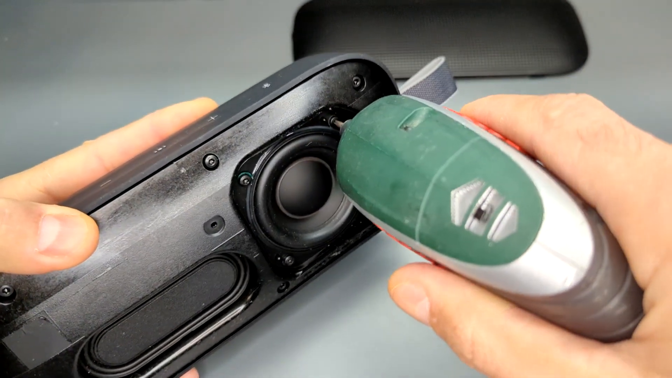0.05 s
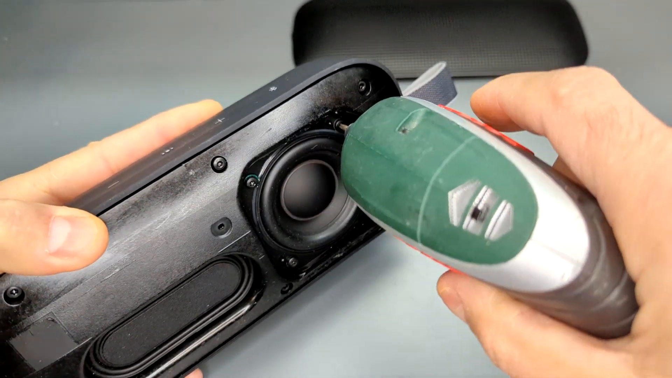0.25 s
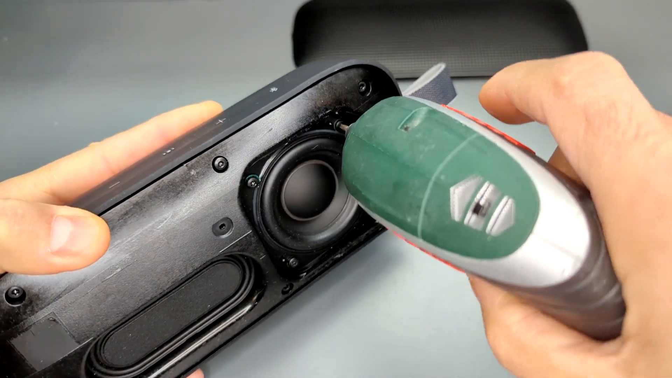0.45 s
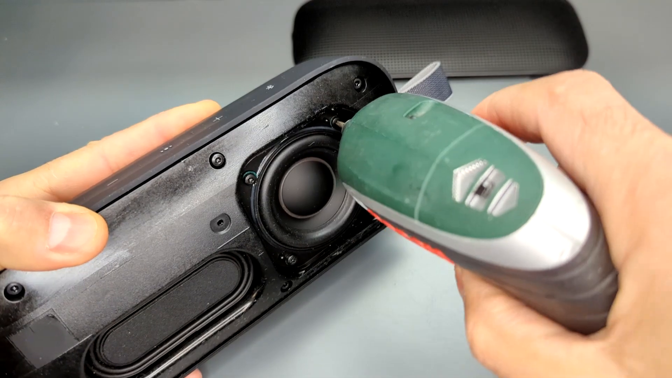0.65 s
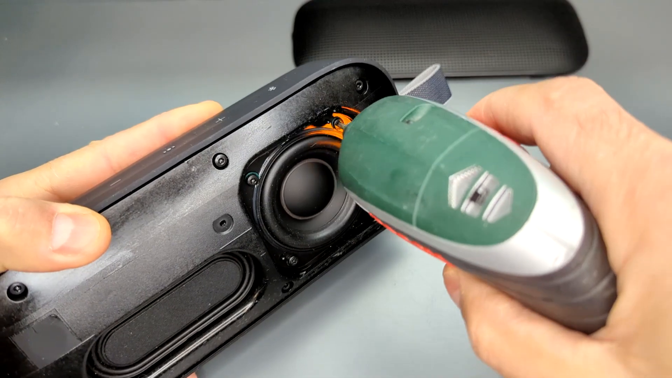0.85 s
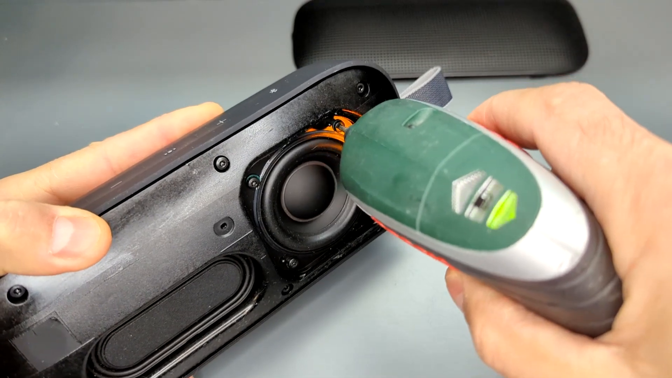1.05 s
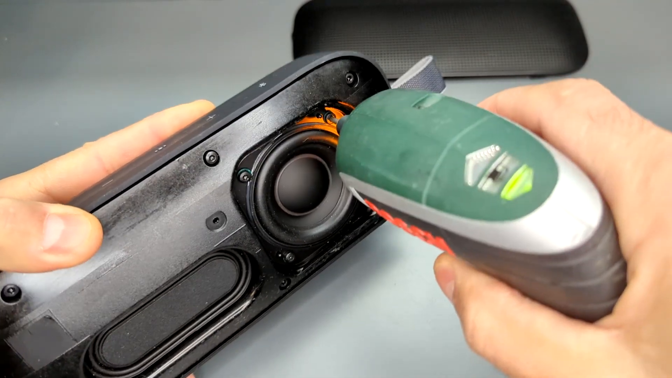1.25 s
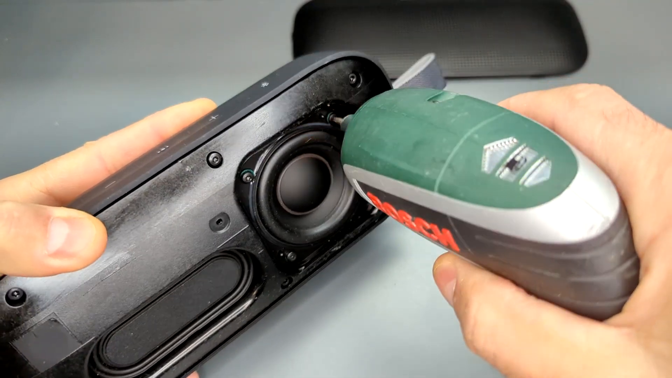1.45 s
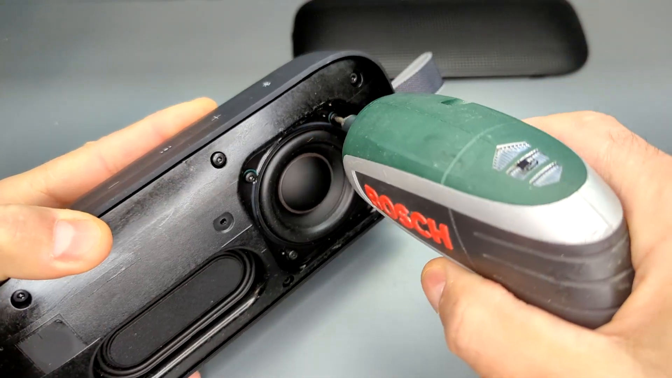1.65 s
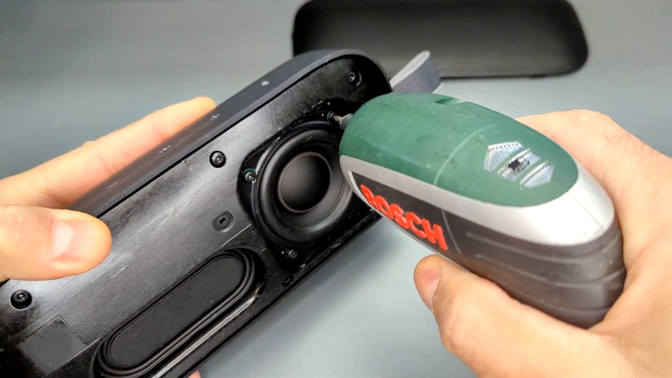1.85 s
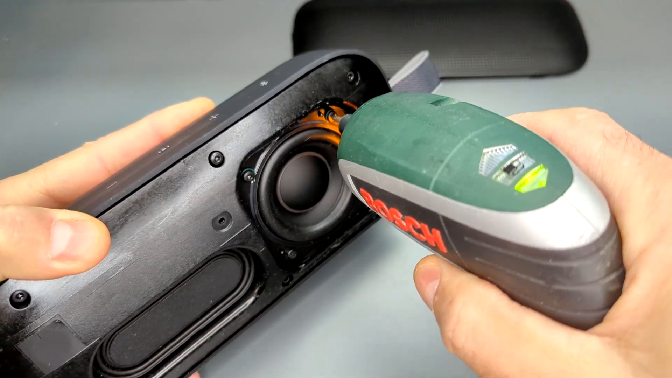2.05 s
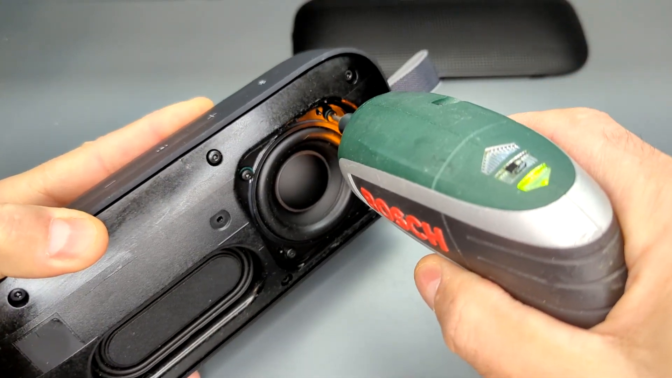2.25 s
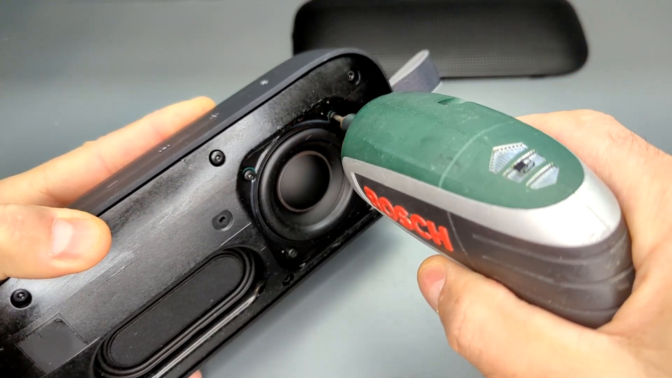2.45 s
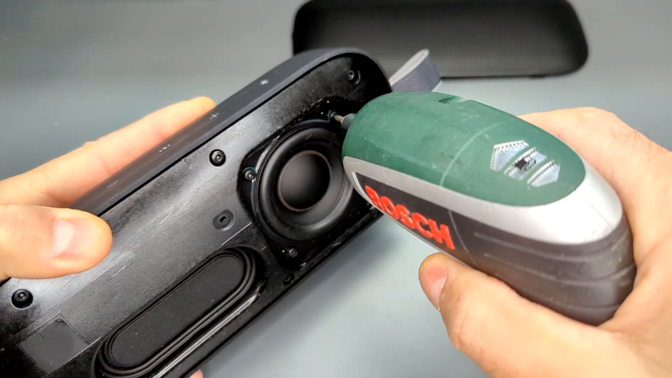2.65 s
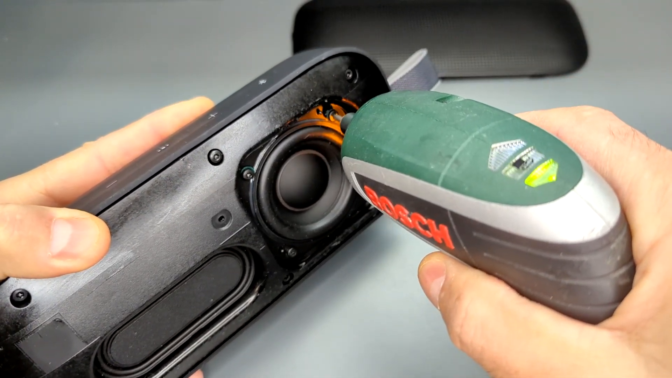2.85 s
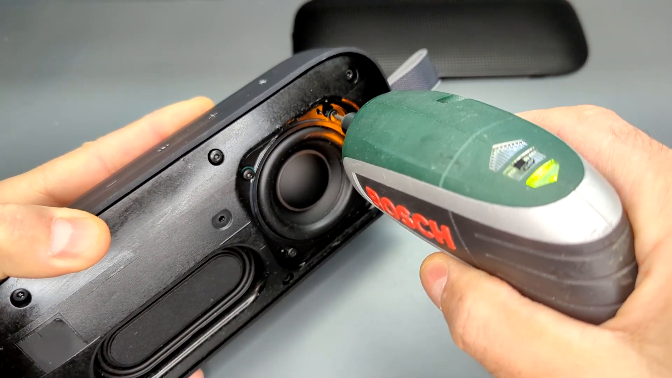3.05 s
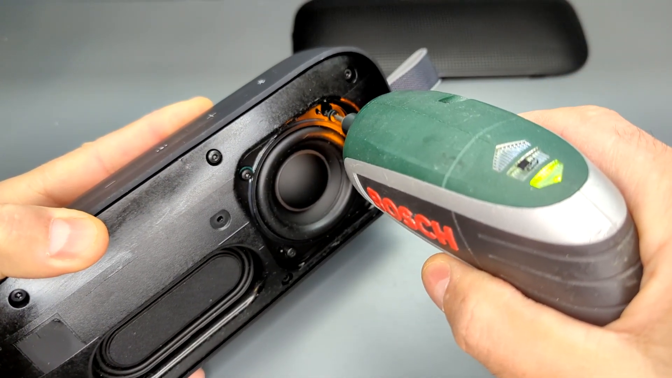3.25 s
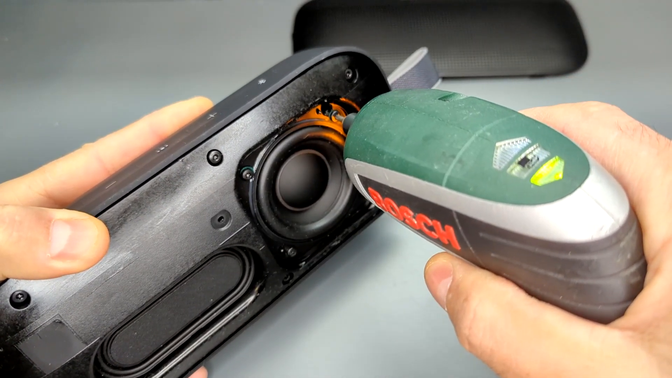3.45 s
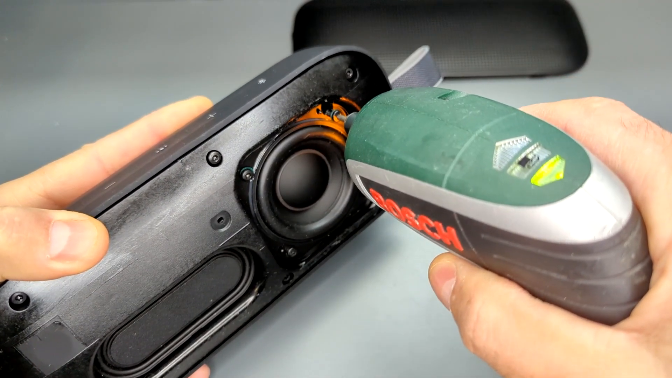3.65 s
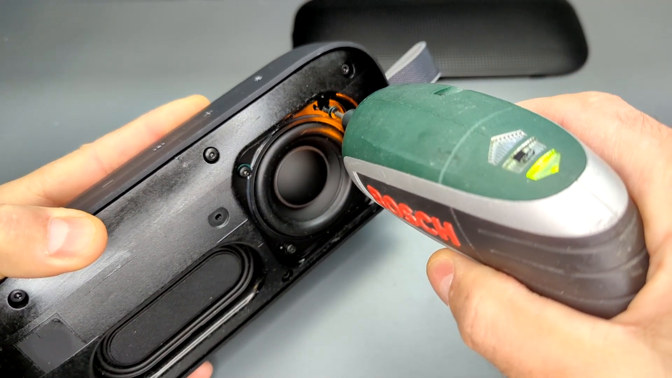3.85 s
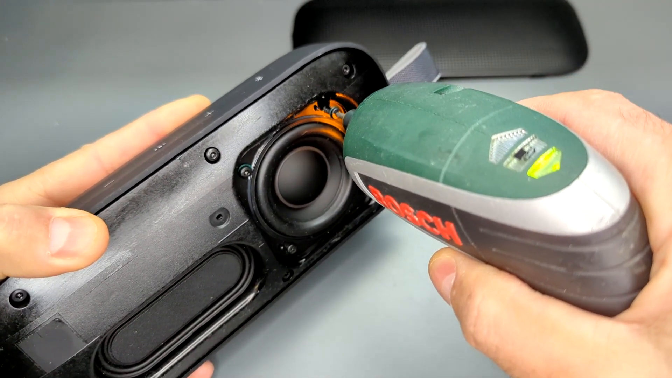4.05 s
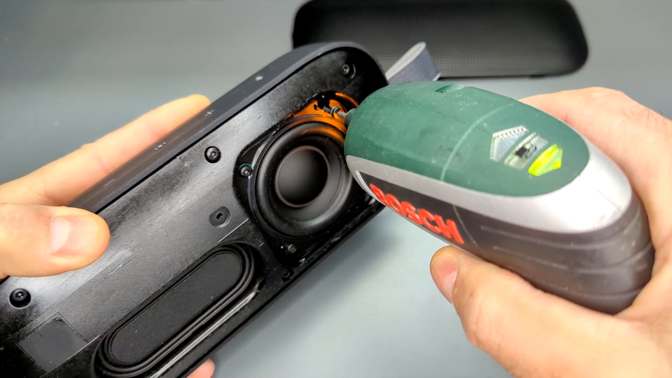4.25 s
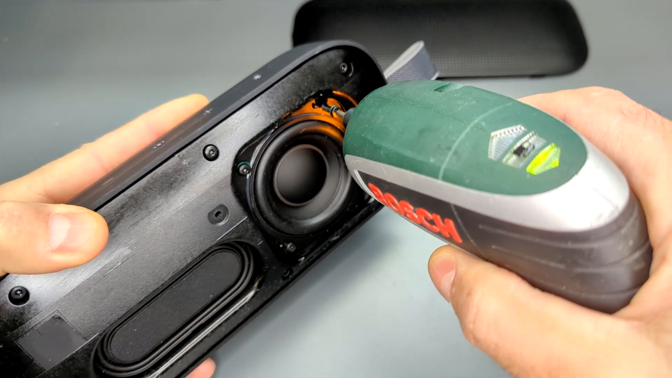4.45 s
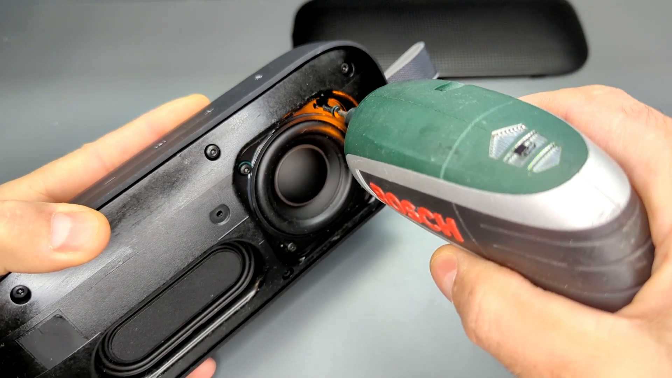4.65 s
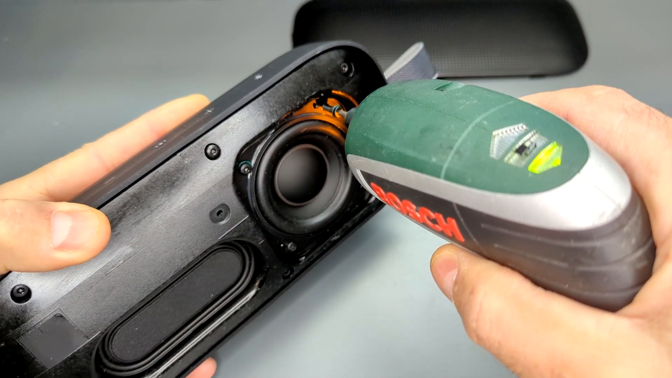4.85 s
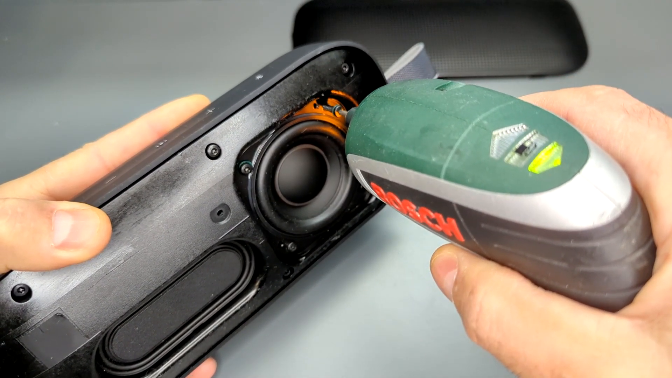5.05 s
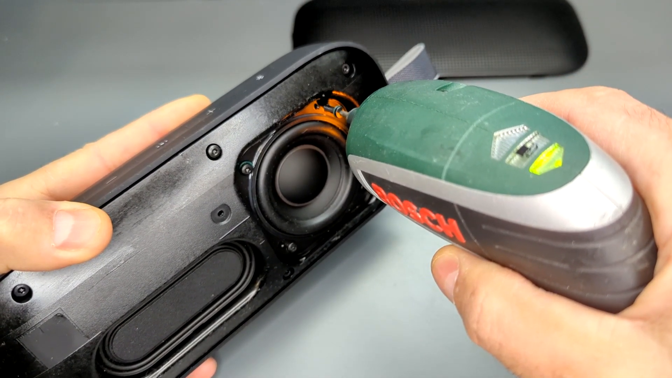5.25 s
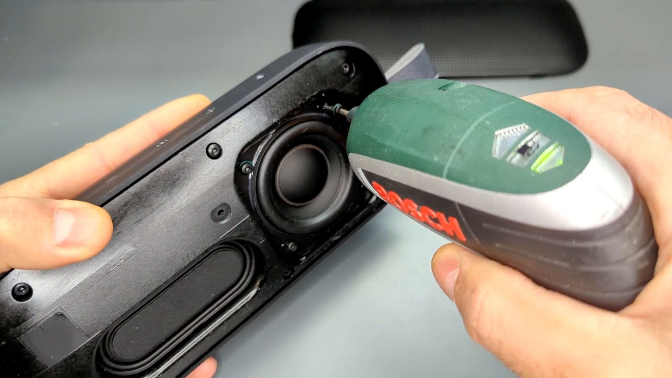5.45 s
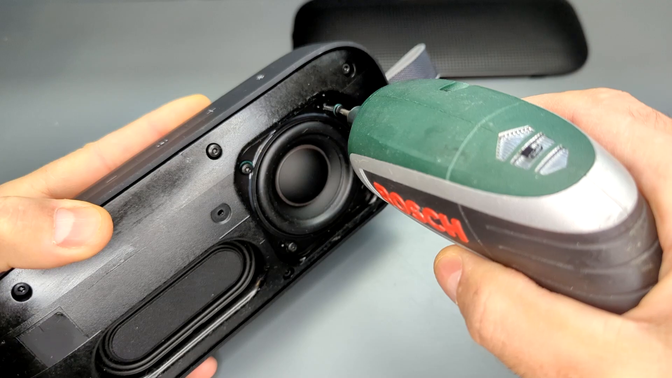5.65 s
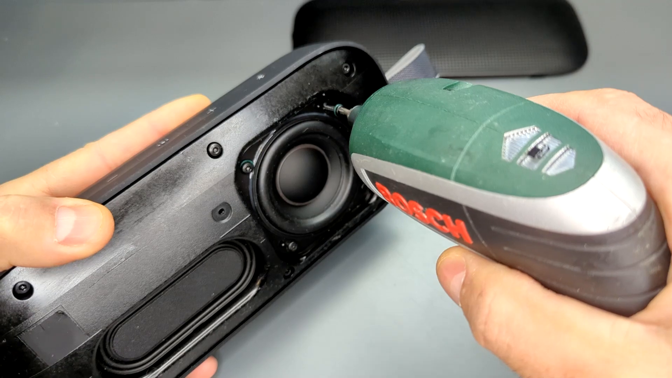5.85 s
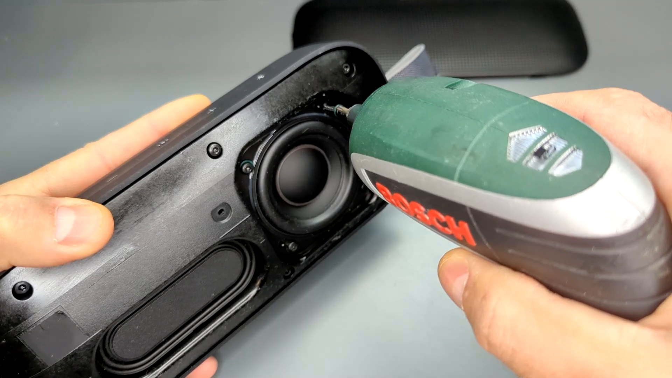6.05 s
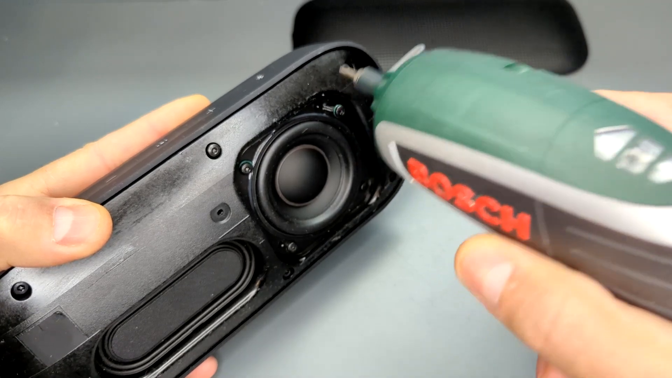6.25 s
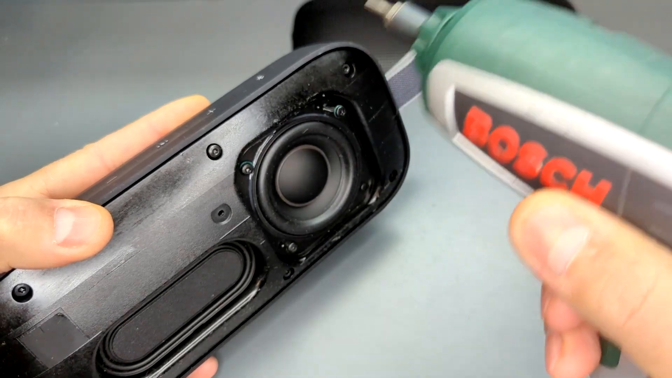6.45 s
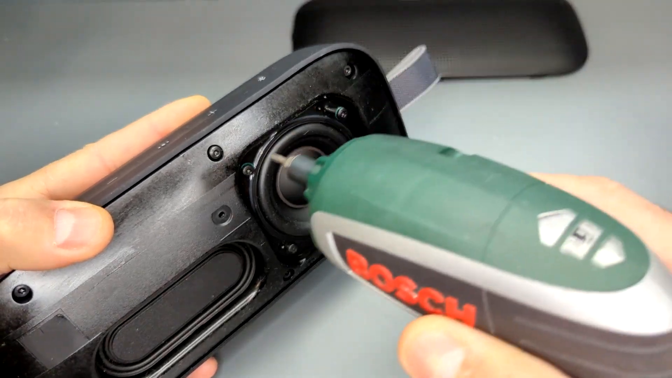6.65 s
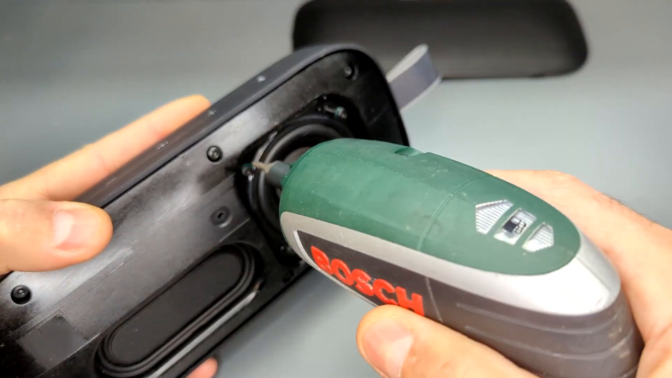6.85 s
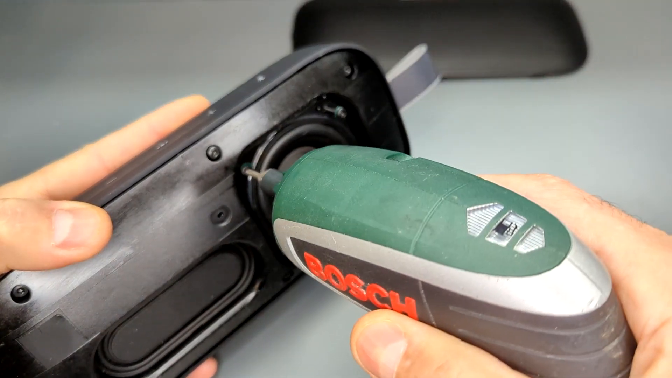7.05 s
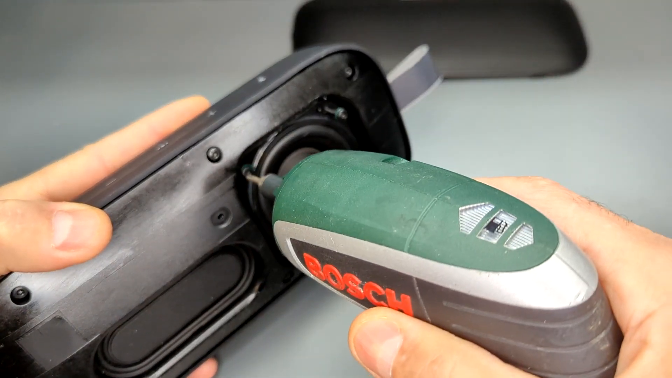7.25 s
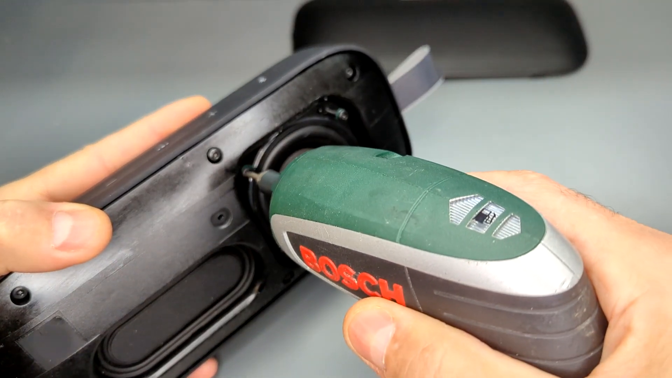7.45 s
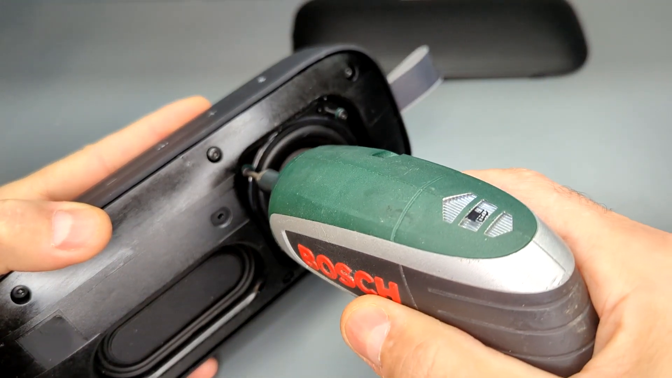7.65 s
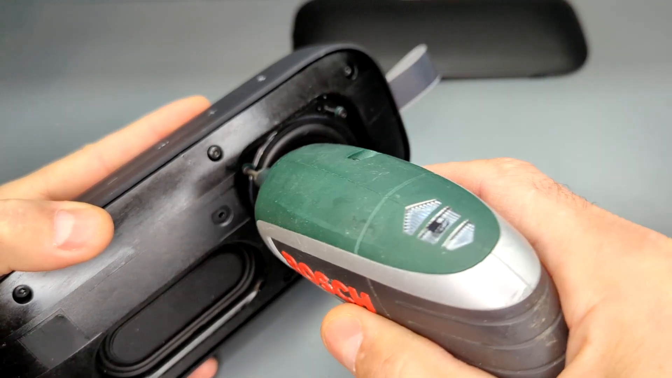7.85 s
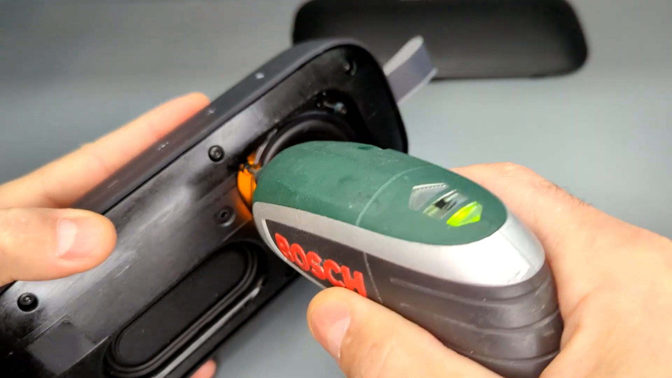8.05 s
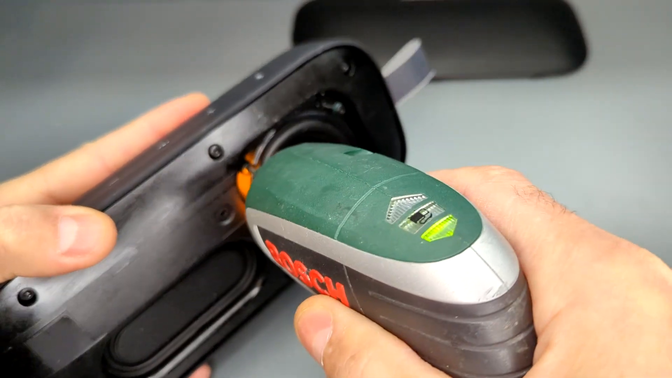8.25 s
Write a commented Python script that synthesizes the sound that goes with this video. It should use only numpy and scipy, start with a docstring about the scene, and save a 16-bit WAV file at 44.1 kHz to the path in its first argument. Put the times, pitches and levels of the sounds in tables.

```python
"""A quiet room with a low rumble, then ticks and scrapes of a bit on plastic close to a stereo microphone.
A cordless screwdriver then backs screws out of a plastic housing on a bench, in bursts.
Its three-pole motor whines on multiples of the shaft speed; the planetary gears rattle as shaped noise
and sing under load as tones of the meshing teeth. Ticks are noise cracks over a ring of the plastic,
scrapes are grainy noise, and something creaks low as a run of slips that each ring a hollow body."""
import sys
import numpy as np
from scipy import signal
from scipy.fft import rfft, irfft, next_fast_len
from scipy.io import wavfile
from scipy.ndimage import uniform_filter1d

SR = 44100
rng = np.random.default_rng(int(sys.argv[2]) if len(sys.argv) > 2 else 0)


def convert_level_to_amplitude(level_db):
    """Map a level in decibels to its linear amplitude factor."""
    exponent = np.asarray(level_db, float) / 20
    return 10 ** exponent


def int16_out(signal):
    """Quantize to a 16-bit WAV file."""
    q = np.round(np.clip(np.atleast_2d(signal).T, -1, 1) * 32767)
    wavfile.write(sys.argv[1], SR, q.astype(np.int16))


N = 366471  # length in samples

POLES, TEETH = 3, 9
MESH_SHARE = .593  # teeth meet at this share of shaft speed, since the planets run along
MESH_PER_TURN = TEETH * MESH_SHARE

# Modes of the hollow body that creaks; the first also tunes the hum of the held housing.
# Each row: frequency in Hz, relative level in dB, time to fall 60 dB in seconds.
BODY_MODES = [(375, -3, 0.063), (446, 5, 0.02), (286, -30, 0.059), (546, -7, 0.031)]


def evened(x):
    """Scales to rms 1."""
    return x / np.sqrt(np.mean(x ** 2) + 1e-20)


def read(points, hz):
    """Reads a (Hz, value) table on a log-frequency axis."""
    f, value = np.transpose(points)
    return np.interp(np.log(hz + 1), np.log(f + 1), value)


def curve(rows):
    """A (s, value) table at every sample."""
    return np.interp(np.arange(N) / SR, *np.transpose(rows))


def add(mix, s, sound):
    """Mixes a sound in at s seconds."""
    part = mix[..., round(s * SR):][..., :sound.shape[-1]]
    part += sound[..., :part.shape[-1]]


def colour(x, db_of_hz):
    """Filters by a gain rule in dB over frequency."""
    size = next_fast_len(x.shape[-1])
    gain = convert_level_to_amplitude(db_of_hz(np.fft.rfftfreq(size, 1 / SR)))
    return irfft(rfft(x, size) * gain, size)[..., :x.shape[-1]]


def wander(size, hz):
    """Random drift of rms 1, slower than hz."""
    lowpass = signal.butter(2, hz, fs=SR, output="sos")
    return evened(signal.sosfilt(lowpass, rng.standard_normal(size)))


def swells(rows, rise_db_per_s, fall_db_per_s):
    """Gain of (start s, hold s, dB) events that climb, hold and sink on straight dB slopes."""
    t = np.arange(N) / SR
    gain = np.zeros(N)
    for s, hold, db in rows:
        climb = rise_db_per_s * np.maximum(s - t, 0)
        sink = fall_db_per_s * np.maximum(t - s - hold, 0)
        gain += convert_level_to_amplitude(db - climb - sink)
    return gain


def ring(modes, spread, rise):
    """One blow on a set of modes, each with chance in level and pitch, rising over some seconds; peak 1."""
    t = np.arange(SR // 8) / SR
    hz, db, t60 = np.transpose(modes)[:, :, None]
    level_chance, pitch_chance = rng.standard_normal((2, len(modes), 1))
    decay = convert_level_to_amplitude(db + spread * level_chance - 60 * t / t60)
    wave = np.sin(2 * np.pi * hz * (1 + 0.031 * spread * pitch_chance) * t)
    blow = (decay * wave).sum(0) * (1 - np.exp(-t / rise)) ** 2
    return blow / abs(blow).max()


def room_hiss():
    """Faint drifting hiss of the room, partly alike in the two ears, 6 dB stronger on the left."""
    # Each row: time in seconds, level in dB midway between the ears.
    level = [(0, -66), (6, -63), (6.6, -64.5), (7.4, -71), (8.3, -66.5)]
    # Each row: frequency in Hz, relative density in dB per Hz.
    hiss_spectrum = [(12, -53.5), (25, -37.5), (88, -11.5), (190, -23), (235, -8.5), (320, -20),
                     (1060, -22), (1190, -18.5), (1380, -25.5), (2050, -7.5), (2500, -18), (2980, -10.5),
                     (4200, -27), (5400, -37), (6500, -29), (8200, -39.5), (16000, -46.5)]
    # Each row: frequency in Hz, left-right likeness from -1 to 1.
    likeness = [(30, 1), (100, 0.92), (240, 0.71), (950, 0.16), (3770, -0.41), (15000, 0)]
    size = next_fast_len(N)
    hz = np.fft.rfftfreq(size, 1 / SR)
    a, b = rfft(rng.standard_normal((2, size)))
    same = np.clip(read(likeness, hz), -1, 1)
    ears = np.array([a, same * a + np.sqrt(1 - same ** 2) * b])
    hiss = irfft(ears * convert_level_to_amplitude(read(hiss_spectrum, hz)), size)[:, :N]
    return convert_level_to_amplitude(curve(level) + [[3], [-3]]) * evened(hiss)


def bench_rumble():
    """Low noise through the bench, swelling with hand jolts and while the running tool shakes it."""
    # Underlying rumble. Each row: time in seconds, relative level in dB.
    rumble = [(0, -68), (6.6, -64.5), (7.4, -76), (8.3, -64.5)]
    # Hand jolts. Each row: time in seconds, relative level in dB.
    bumps = [(.53, -53), (0.709, -62.5), (1.11, -42.5), (1.461, -55), (2.05, -52.5), (2.16, -59),
             (2.342, -50.5), (2.92, -58.5), (4.15, -59), (4.51, -56), (6.5, -71), (6.7, -65), (6.89, -68),
             (7.57, -55), (7.75, -57), (8.14, -45)]
    # Shaking by the tool. Each row: start in seconds, hold in seconds, relative level in dB.
    shake = [(2.9, 0.64, -58), (3.7, 0.8, -61.5)]
    # Each row: frequency in Hz, relative density in dB per Hz.
    thud_spectrum = [(12, -34.5), (20, -13.5), (65, -1), (97, -3.5), (162, 0.5), (303, -5), (499, -22),
                     (600, -18), (780, -40), (1320, -120)]
    low = rng.standard_normal(N) + .22 * rng.standard_normal((2, N))  # nearly the same in both ears
    low = colour(low, lambda hz: read(thud_spectrum, hz) - 30 * np.log2(np.maximum(hz / 600, 1)))
    events = [(s, 0, db) for s, db in bumps] + list(shake)
    jolts = swells(events, rise_db_per_s=251.5, fall_db_per_s=132)
    return convert_level_to_amplitude(-9) * (convert_level_to_amplitude(curve(rumble)) + jolts) * evened(low)


def creak():
    """Stick and slip: a run of slips that each ring a low hollow body, a little left of centre."""
    # Each entry: time of a slip in seconds.
    slips = [5.692, 5.719, 5.742, 5.769, 5.795, 5.81, 5.84, 5.871, 5.897, 5.921, 5.948, 5.975, 6.001, 6.035,
             6.073, 6.116, 6.158, 6.197, 6.251, 6.282, 6.316, 6.343, 6.379, 6.422, 6.448, 6.479, 6.505]
    out = np.zeros(N)
    for s, chance in zip(slips, rng.standard_normal(len(slips))):
        db = -39 - 10 * np.exp(-(s - slips[0]) / .12)  # starts weak and grows
        db += 0.8 * chance - 8 * (s == slips[-1])  # lets go with a weak slip
        add(out, s, convert_level_to_amplitude(db) * ring(BODY_MODES, spread=0.73, rise=0.0015))
    # keeps the band between about 220 and 650 Hz
    out = colour(out, lambda hz: -10 * np.log10(1 + (220 / (hz + 1)) ** 6 + (hz / 650) ** 6))
    return out * convert_level_to_amplitude([[1.5], [-1.5]])


def scrapes():
    """Grainy rubbing of the bit on plastic: coloured noise of fast random level in short swells."""
    # Each row: start in seconds, hold in seconds, level in dB.
    scrape_events = [(.16, 0.029, -64), (.482, 0.024, -48), (.535, 0.036, -59.5), (.699, 0.062, -50),
                     (1.833, .02, -53.5), (6.33, 0.04, -63.5), (7.565, 0.027, -61), (7.64, 0.021, -65),
                     (7.955, 0.034, -63)]
    # Each row: frequency in Hz, relative density in dB per Hz.
    scrape_spectrum = [(180, -46), (300, -35), (398, -15), (1010, -14.5), (2140, -1.5), (3290, -7.5),
                       (6520, -20), (16000, -35)]
    grain = rng.standard_normal((2, N)) * convert_level_to_amplitude(3.2 * wander(N, 600))
    rubbing = evened(colour(grain, lambda hz: read(scrape_spectrum, hz)))
    return swells(scrape_events, rise_db_per_s=4000, fall_db_per_s=343.5) * rubbing


def ticks():
    """Bit and trigger: a short dry crack of noise over a brief ring of the plastic."""
    # Each row: time in seconds, level in dB, treble tilt of the crack in dB, left over right in dB.
    tick_events = [(0.193, -35, -10, 3.5), (0.251, -40.5, -5.5, 4), (0.284, -33.5, 1.5, 1),
                   (0.382, -38.5, -12, 3), (0.481, -35, -2.5, 7.5), (0.49, -17.5, 13, 5),
                   (0.534, -18.5, -1, 3.5), (0.595, -47.5, -9, 3), (0.7, -40, -9, 3.0),
                   (1.057, -26.5, -12, 5), (1.834, -44.5, -20, 7), (2.022, -27, -4, 4.5),
                   (2.814, -25.5, -2.5, 7.5), (5.94, -49, -28, 1), (6.325, -33, -10, 5.5),
                   (6.497, -40, -40, 7.0), (7.559, -27.5, -36, 5.5), (7.604, -36.5, -15, 3),
                   (7.643, -31.5, -57, 8), (7.712, -37.5, -45, 4), (7.832, -42, -40, 5),
                   (7.952, -38.5, -41, 5.0), (8.081, -19, 0.5, -2)]
    # Each row: frequency in Hz, relative density in dB per Hz.
    crack_spectrum = [(180, -56.5), (300, -14), (1120, -8.5), (3030, -12.5), (4160, -7.5), (7320, -7),
                      (16000, -29)]
    # Each row: frequency in Hz, relative level in dB, time to fall 60 dB in s before the tick's own fade.
    plastic_modes = [(810, -21.5, 0.059), (1009, 2.5, 0.06), (1600, -24, 0.093), (1982, 1, 0.37),
                     (2770, -19.5, 0.056), (3200, 9.5, 0.276), (5430, -50, 0.29)]
    out, t = np.zeros((2, N)), np.arange(SR // 8) / SR
    fade = convert_level_to_amplitude(-60 * t / .027) * (1 - np.exp(-t / .0006))
    for s, db, treble_db, pan_db in tick_events:
        noise = rng.standard_normal(len(t)) + 2.2 * rng.standard_normal((2, len(t)))

        def crack_db(hz):
            return read(crack_spectrum, hz) + treble_db * np.clip(np.log2(hz / 3500 + 0.12), 0, 1)

        crack = evened(colour(noise, crack_db))
        ping = .2 * ring(plastic_modes, spread=6, rise=.0003)
        tick = (ping + 0.29 * crack) * fade
        add(out, s, convert_level_to_amplitude(db + pan_db * np.array([[.5], [-.5]])) * tick)
    return out


def motor_whine(turn, shaft_db, pole_db):
    """Tones on multiples of the shaft angle: its shake, the passing poles and the whine around them."""
    # Each row: multiple of shaft speed, level in dB over the pole tone.
    whine = [(2, -25), (4, -13), (4.66, -14), (6.27, -12), (9, -12), (18, -12), (24, -9)]
    size = len(turn)
    tone = convert_level_to_amplitude(shaft_db) * np.cos(turn)
    tone += convert_level_to_amplitude(pole_db + 0.99 * wander(size, 43)) * np.cos(POLES * turn)
    for multiple, db in whine:
        tone += convert_level_to_amplitude(pole_db + db + wander(size, 25)) * np.cos(multiple * turn)
    return tone


def gear_song(mesh, rattle_db, mesh_db, octave_db):
    """Tones of the meshing teeth: fundamental, octave and flickering overtones."""
    # Each row: multiple of the mesh frequency, relative level in dB.
    overtones = [(3, 0), (4, -1), (5, -1), (6, -6), (7, -4), (9, -8)]
    size = len(mesh)
    throb_db = 2.5 * wander(size, 45)  # the screw grips unevenly: all mesh tones lurch together
    tone = convert_level_to_amplitude(mesh_db + throb_db + 1.2 * wander(size, 70)) * np.cos(mesh)
    octave_gain = convert_level_to_amplitude(octave_db + throb_db + 1.8 * wander(size, 71))
    tone = tone + octave_gain * np.cos(2 * mesh + [[.4], [-.4]])
    over_db = np.minimum(octave_db - 9, rattle_db - 11)  # overtones follow the octave, up to a limit
    # overtones reach each ear by another path, so with another phase
    phases = 1.6 * rng.random((len(overtones), 2, 1)) + 2 * np.pi * rng.random((len(overtones), 1, 1))
    for (multiple, db), phase in zip(overtones, phases):
        flicker_db = 5.5 * wander(size, 55)
        tone = tone + convert_level_to_amplitude(over_db + db + throb_db + flicker_db) * np.cos(multiple * mesh + phase)
    return tone


def gear_rattle(t, turn, speed, low_db, top_db):
    """Random knocks of loose teeth and brush hiss, as noise that rings the tool shell."""
    # Each row: frequency in Hz, relative density in dB per Hz.
    rattle_spectrum = [(53, -63), (90, -28), (201, -28.5), (255, -24), (467, -23.5), (753, -6.5),
                       (821, -4.5), (1440, -8.5), (1610, -4), (3590, 0.5), (5180, -2.5), (6160, 0.5),
                       (8910, -5), (15000, -14.5), (16000, -39.5)]
    # Shell resonances, boosting by 4.3 dB times the weight as a factor of 10 ** (weight / 200).
    # Each row: frequency in Hz, width in Hz, weight.
    shell = [(1620, 57, 0), (1906, 140, -12), (2930, 47, -9), (3700, 27, -2), (6400, 140, 3),
             (7400, 200, -3.5), (8900, 580, 3), (9890, 130, -15), (12000, 120, -12.5)]
    # The shell radiates from many spots. Each row: frequency in Hz, left-right likeness.
    likeness = [(60, 0.48), (300, 0.27), (700, 0.42), (1500, .7), (3000, 0.57), (6000, 0.7), (15000, 0.32)]
    # Each row: frequency in Hz, phase in radians by which the left leads.
    lead = [(60, 0.3), (700, 0), (1500, 1.3), (3000, 1), (6000, 1.62), (15000, 1.3)]
    size = len(t)
    # loose teeth knock at random, more often at speed, over brush hiss
    struck = rng.random(size) < 2.5 * speed / SR
    knocks = struck * convert_level_to_amplitude(3.3 * np.minimum(rng.exponential(1, size), 5))
    knocks = evened(signal.lfilter([1], [1, -np.exp(-1 / (0.00031 * SR))], knocks))  # 0.31 ms decay
    drive = (1.9 * np.sqrt(speed / 260) + 0.51 * knocks) * rng.standard_normal((2, size))
    # one rough tooth throbs each pass
    drive *= (1 + 0.09 * np.cos(MESH_SHARE * turn)) * convert_level_to_amplitude(0.38 * wander(size, 20))

    f, at, z = signal.stft(drive, SR, nperseg=512, noverlap=384)
    same = np.clip(read(likeness, f), 0, 1)[:, None]
    z[1] = same * np.exp(-1j * read(lead, f))[:, None] * z[0] + np.sqrt(1 - same ** 2) * z[1]
    # the grip and the angle keep shifting the colour
    patches = uniform_filter1d(rng.standard_normal(z.shape[1:]), 5, axis=0)
    z *= convert_level_to_amplitude(1.8 * evened(uniform_filter1d(patches, 16, axis=1)))
    shell_db = sum(4.3 * convert_level_to_amplitude(.1 * weight) / (1 + (2 * (f - hz) / width) ** 2) for hz, width, weight in shell)
    top = np.interp(at, t - t[0], top_db)
    low = np.interp(at, t - t[0], low_db)
    octaves_up = np.clip(np.log2(f / 4500 + 1e-9), 0, 1.2)[:, None]
    z *= convert_level_to_amplitude((read(rattle_spectrum, f) + shell_db)[:, None] + top * octaves_up)
    # level the power above about 2.2 kHz over time, then set the part below
    power = uniform_filter1d((abs(z[:, 26:]) ** 2).mean(0).sum(0), size=41)
    z /= power ** .5 * 2 ** .5
    z *= convert_level_to_amplitude(low / (1 + (f[:, None] / 2200) ** 6))
    return signal.istft(z, SR, nperseg=512, noverlap=384)[1][:, :size]


def housing_hum(size):
    """The held housing hums: noise in a narrow band around the first body mode, rms 1."""
    centre_hz = BODY_MODES[0][0]
    noise = rng.standard_normal(size)
    return evened(colour(noise, lambda hz: -10 * np.log10(1 + ((hz - centre_hz) / 35) ** 4)))


def burst(rows, pitch_per_turn, pole_re_db, mesh_extra_db=0, top_extra_db=0):
    """One run of the tool: motor, gears and housing all follow the shaft speed and the load."""
    s, *columns = np.transpose(rows)
    t = np.arange(s[0], s[-1], 1 / SR)
    size = len(t)
    hz, rattle_db, grip_db, shake_db = (np.interp(t, s, c) for c in columns)
    speed = hz / pitch_per_turn  # shaft turns per second
    octaves = np.log2(speed / 250)  # off full speed
    gathering = uniform_filter1d(np.maximum(np.gradient(octaves) * SR, 0), size=441)  # octaves a second

    # the pole tone sags off full speed and drowns while the motor gathers speed
    pole_db = rattle_db + pole_re_db - 13.5 * octaves ** 2 - 0.2485 * gathering ** 2
    octave_db = rattle_db + grip_db
    mesh_db = rattle_db - 11.5 + mesh_extra_db + 0.7 * grip_db
    # the gear case favours the mesh fundamental near 910 Hz
    mesh_db = mesh_db + 6 / (1 + (2 * (MESH_PER_TURN * speed - 910) / 450) ** 2)
    low_db = 0.5 - 7 * octaves  # slow gears rattle lower
    # dB per octave above 4.5 kHz: slow gears are duller, and the treble dims as the screw backs out
    top_db = -1 + top_extra_db + 1.5 * octaves - 2 * (t - t[0])

    turn = 2 * np.pi * np.cumsum(speed * (1 + .003 * wander(size, 37))) / SR
    mesh = 2 * np.pi * np.cumsum(MESH_PER_TURN * speed * (1 + .009 * wander(size, 70))) / SR
    tone = motor_whine(turn, rattle_db + shake_db, pole_db)
    tone = tone + gear_song(mesh, rattle_db, mesh_db, octave_db)
    tone = tone + convert_level_to_amplitude((rattle_db + mesh_db) / 2 - 28.5) * housing_hum(size)  # more under load
    rattle = gear_rattle(t, turn, speed, low_db, top_db)
    fade = np.clip(np.minimum(t - t[0], t[-1] - t) / .002, 0, 1)
    return s[0], (2 ** .5 * tone + convert_level_to_amplitude(rattle_db + 3.5) * rattle) * fade


def screwdriver():
    """All bursts of the tool, heard with a left-right balance that varies with frequency."""
    # One table a burst against a tight screw, where the gear mesh sings.
    # Each row: time in seconds, mesh frequency in Hz, relative rattle level in dB,
    # grip of the screw as mesh octave in dB over that level, shaft shake in dB over that level.
    tight = [
        [(1.054, 740, -61.5, -22, -45), (1.06, 751, -36.5, -7, -40), (1.1, 992, -30.5, -27, -40),
         (1.122, 1147, -24.5, -1.5, -25), (1.176, 894, -23, -3, -41), (1.224, 926.2, -23, 3.5, -40),
         (1.314, 989, -24, -6, -50), (1.472, 1093, -25, -10, -24.5), (1.514, 798, -25, -7, -39),
         (1.572, 666, -33, -9, -32), (1.602, 489, -51, -15, -23), (1.72, 290, -79.5, -20, -5)],
        [(8.07, 823, -76.5, -8, -15), (8.088, 787, -32, -16, -40), (8.142, 864, -21, -6, -39),
         (8.194, 927, -24, -3.5, -34), (8.31, 1002, -24.5, 0, -48)],
    ]
    # One table a burst that runs more freely, where the poles sing.
    # Each row: time in seconds, pole frequency in Hz, then rattle, grip and shake in dB as above.
    free = [
        [(2.01, 337.7, -43, -25, -31.5), (2.032, 393.4, -27, -27, -35), (2.06, 478, -26.5, -3, -34),
         (2.1, 617.5, -26, -13, -33), (2.198, 670, -24.5, -12.5, -26), (2.27, 666.5, -24.5, -12.5, -38),
         (2.35, 681.3, -24.5, -9.5, -21), (2.4, 685, -25.5, -22, -40), (2.44, 573.4, -28.5, -11, -38),
         (2.51, 399, -32, -15, -23), (2.55, 346, -33, -21, -45), (2.606, 265, -37, -16, -47),
         (2.676, 207, -68, -23, -24), (2.76, 137, -88, -17, -10)],
        [(2.808, 394, -62, -18, -28), (2.814, 415.3, -35, -14, -32), (2.84, 492.5, -28.5, -18, -44.5),
         (2.88, 632, -25, -13, -36), (2.92, 660.5, -25, -25, -28), (3.0, 716, -24.5, -9, -25),
         (3.05, 722.5, -26.5, -16, -29.5), (3.42, 764.2, -26.5, -18, -33), (4.44, 801.6, -25, -25, -35),
         (4.6, 645, -27.5, -19, -32), (4.65, 560.2, -28.5, -22, -45), (4.71, 453.3, -32.5, -17, -19),
         (4.74, 424.6, -32.5, -25, -40), (4.78, 640, -26.5, -14, -33), (4.83, 719, -27.5, -13, -42),
         (4.91, 790.8, -26, -27, -39), (5.38, 804.4, -26, -24, -52), (5.46, 681.5, -27.5, -8.5, -43),
         (5.63, 405.4, -33.5, -25, -37), (5.75, 318.6, -40.5, -9, -40), (5.86, 217, -48.5, -12, -32),
         (5.91, 175, -59, -18, -30), (5.98, 135.2, -81, -10, -15)],
    ]
    # Each row: frequency in Hz, left over right in dB.
    balance = [(60, 2), (180, 2), (550, 0), (1650, 2.5), (4970, 4.5), (15000, 1)]
    out = np.zeros((2, N))
    for rows in tight:  # a tight screw lifts the top rattle and takes from the mesh fundamental
        add(out, *burst(rows, MESH_PER_TURN, pole_re_db=-41.5, mesh_extra_db=-1, top_extra_db=1.5))
    for rows in free:
        add(out, *burst(rows, POLES, pole_re_db=-13))
    return colour(out, lambda hz: np.outer([.5, -.5], read(balance, hz)))


def bench(x):
    """Direct sound plus a faint tail of reflections, other taps in each ear."""
    t = np.arange(SR // 4) / SR
    taps = rng.standard_normal((2, len(t))) * convert_level_to_amplitude(-60 * t / 0.17) * (t > .003)
    taps /= np.linalg.norm(taps, axis=1, keepdims=True)
    return x + convert_level_to_amplitude(-15) * signal.fftconvolve(x, taps, axes=1)[:, :N]


def scene():
    """Tool and handling on the bench, in the room."""
    background = room_hiss() + bench_rumble() + creak()
    return background + bench(scrapes() + ticks() + screwdriver())


def low_pass(x):
    """Removes everything above the highest recorded frequency."""
    return signal.sosfilt(signal.butter(12, 16530, fs=SR, output="sos"), x)


def record(dry):
    """The microphone drops the deepest bass, below about 32 Hz."""
    mix = colour(dry, lambda hz: -10 * np.log10(1 + (32 / (hz + 1)) ** 4))
    return low_pass(mix)


dry = scene()
out = record(dry)
int16_out(out)
```